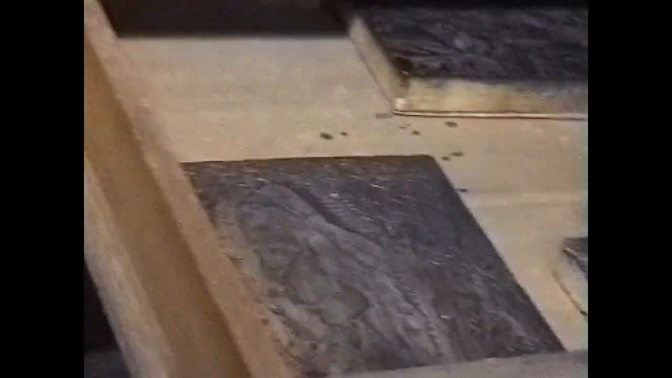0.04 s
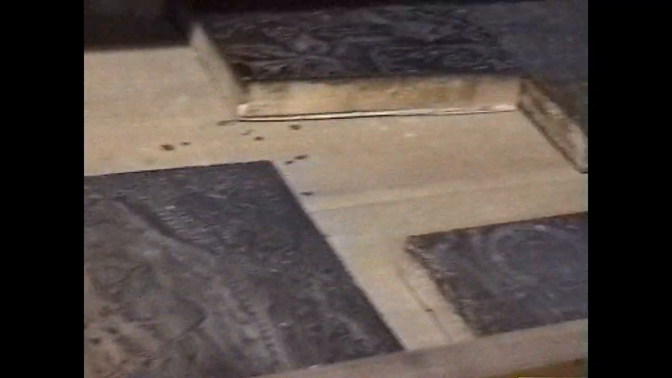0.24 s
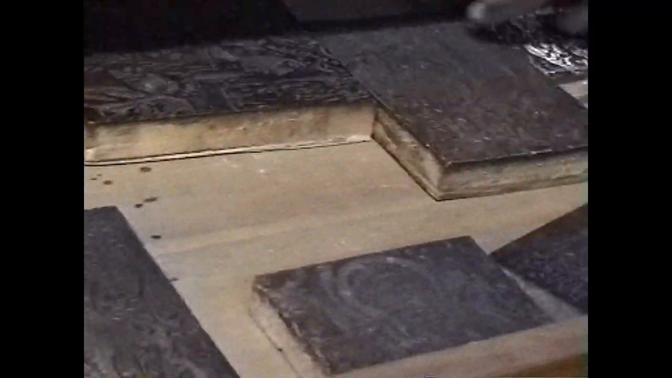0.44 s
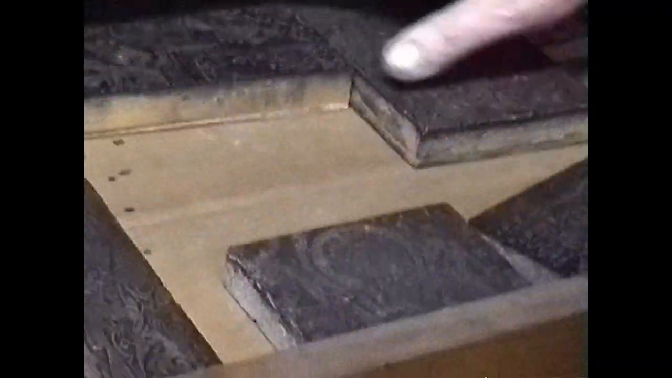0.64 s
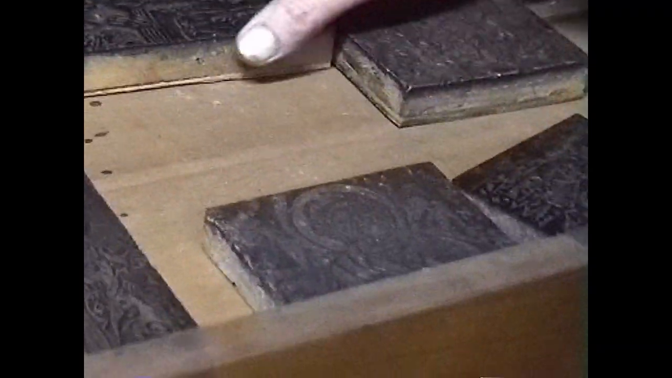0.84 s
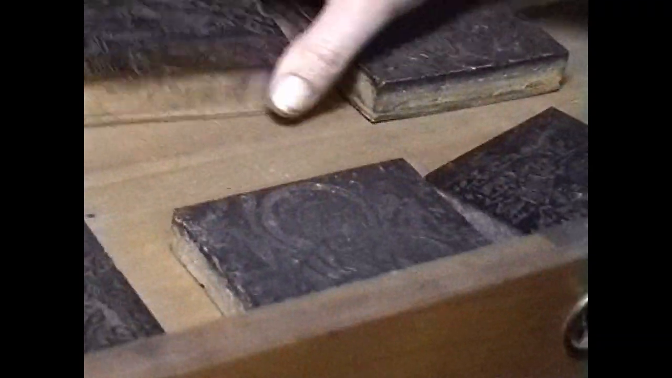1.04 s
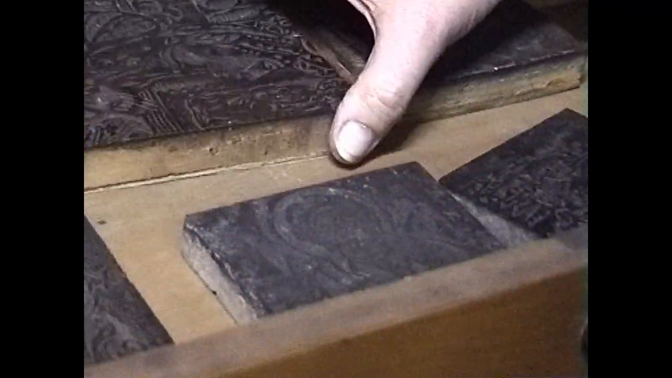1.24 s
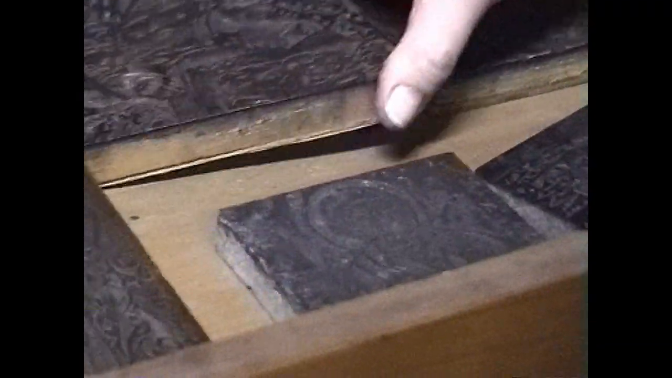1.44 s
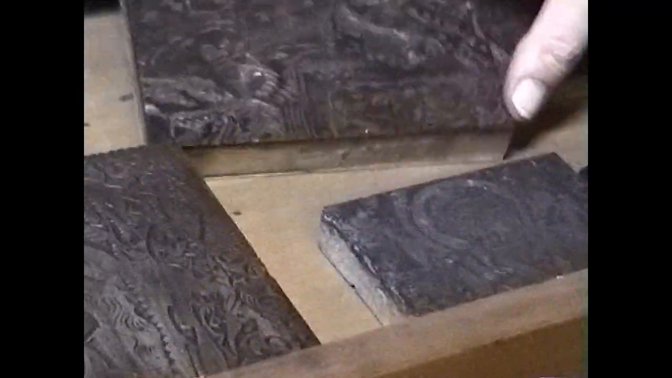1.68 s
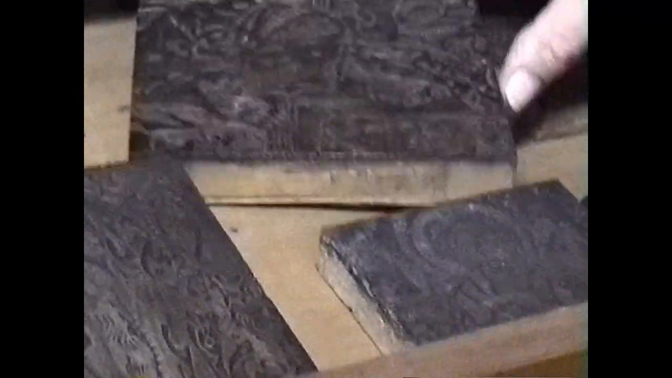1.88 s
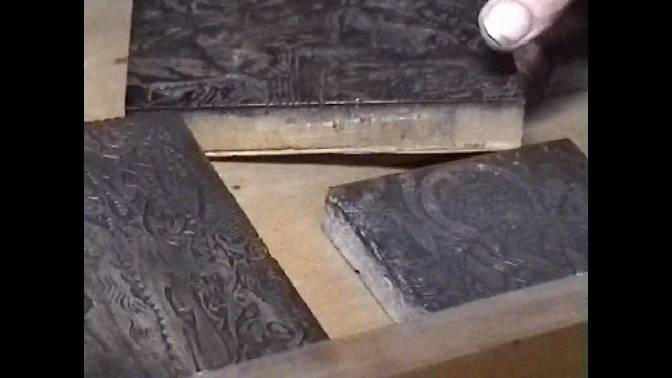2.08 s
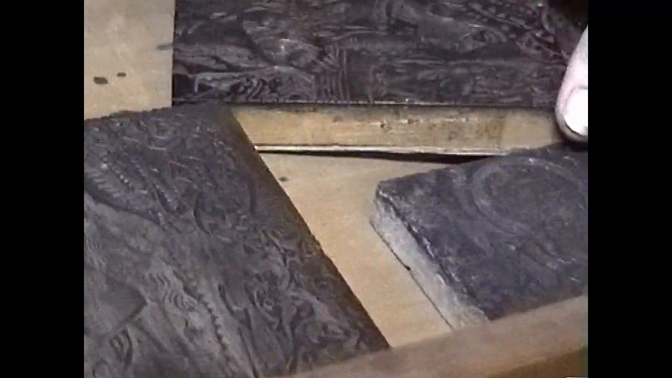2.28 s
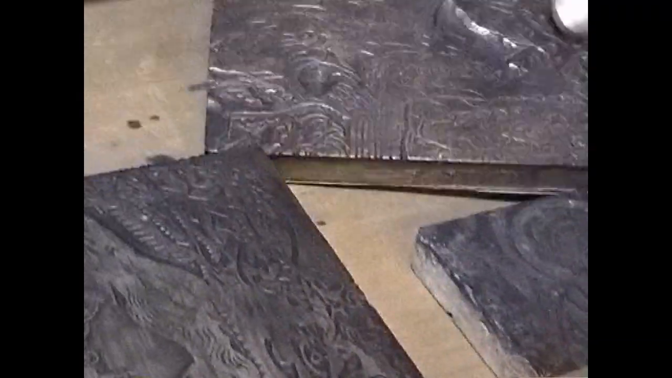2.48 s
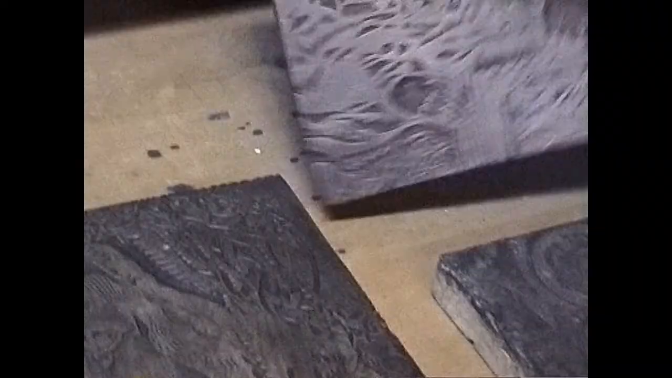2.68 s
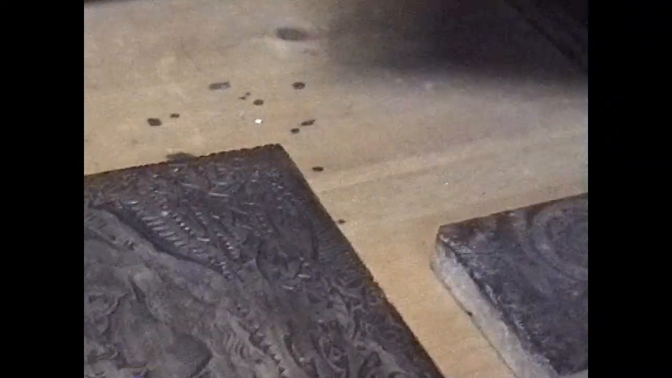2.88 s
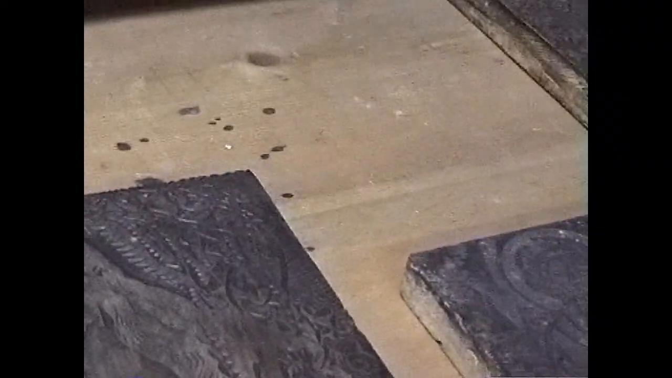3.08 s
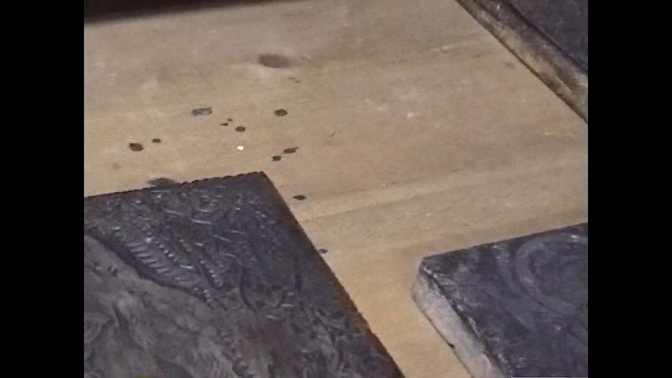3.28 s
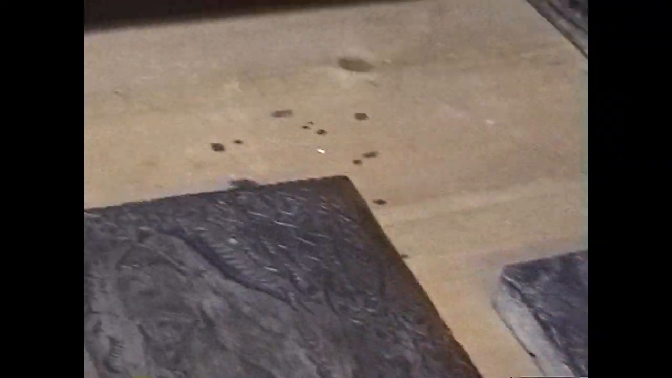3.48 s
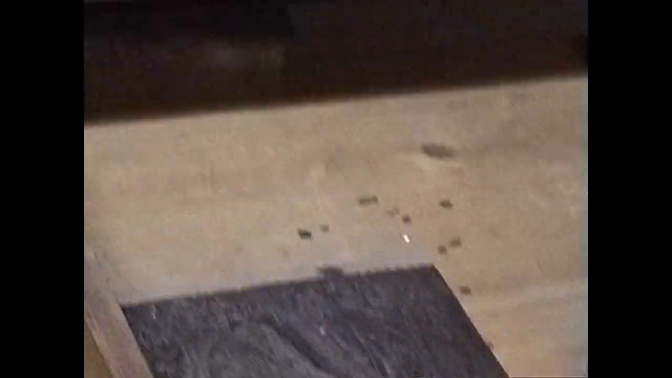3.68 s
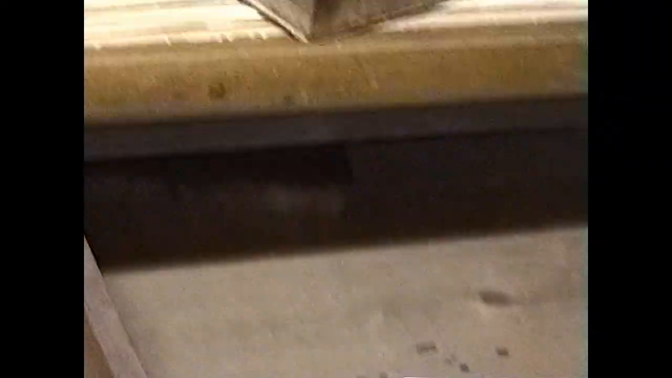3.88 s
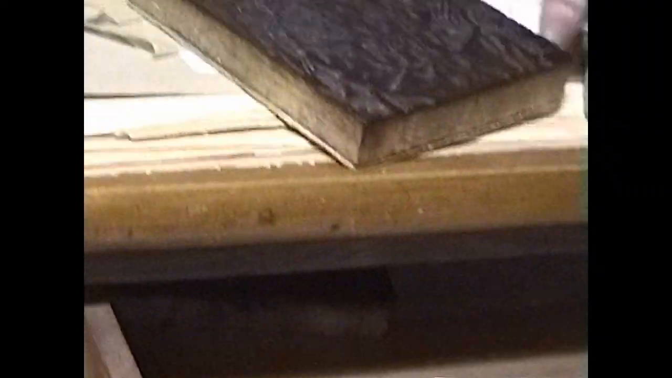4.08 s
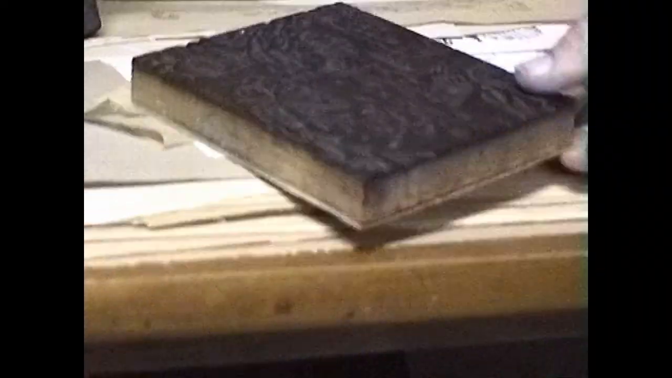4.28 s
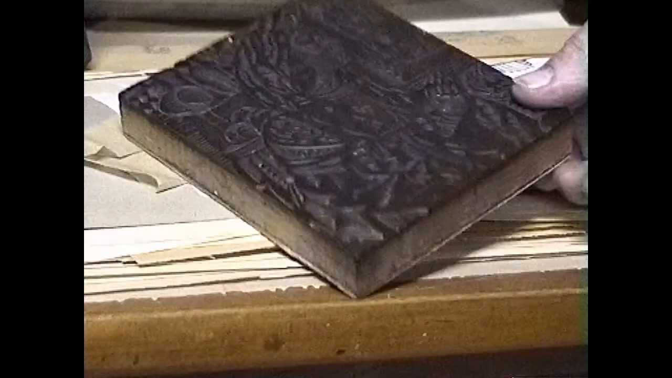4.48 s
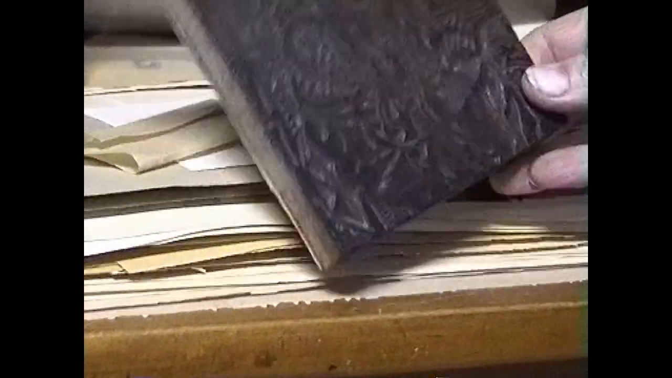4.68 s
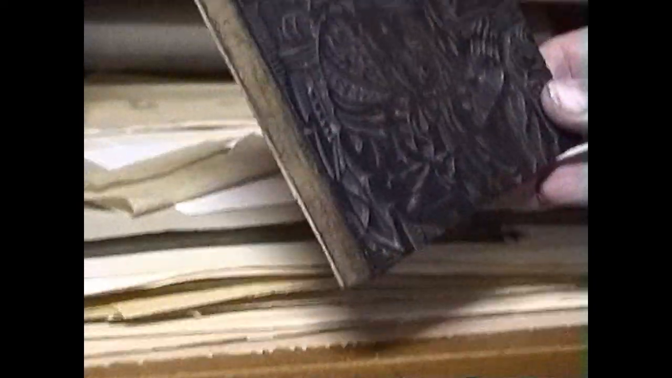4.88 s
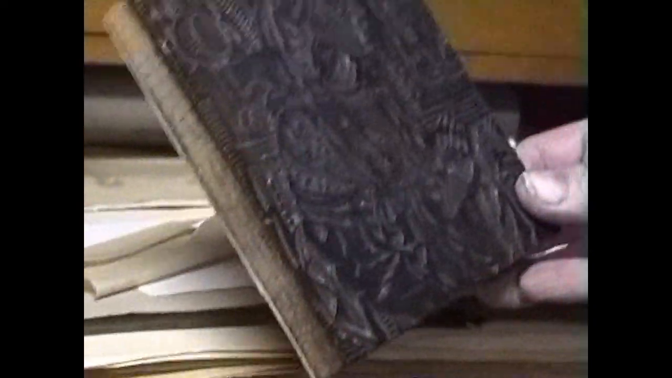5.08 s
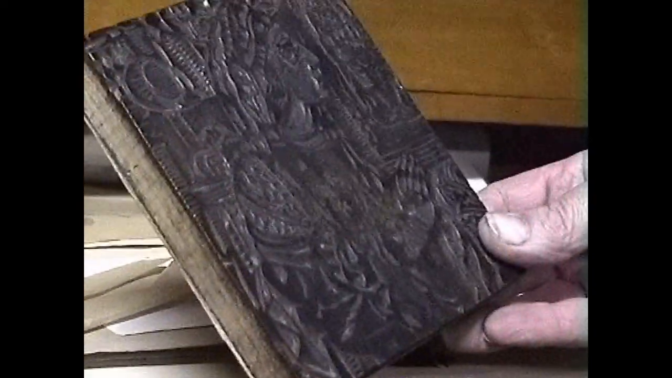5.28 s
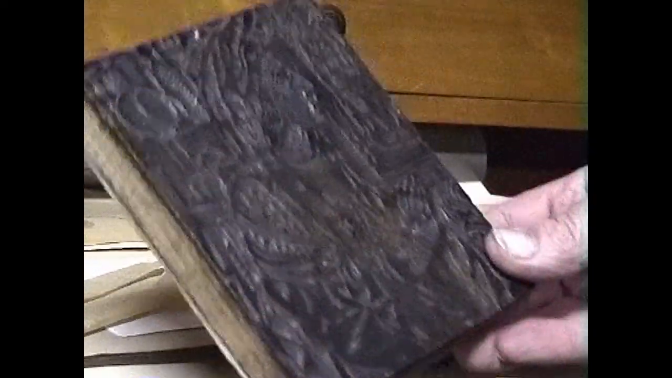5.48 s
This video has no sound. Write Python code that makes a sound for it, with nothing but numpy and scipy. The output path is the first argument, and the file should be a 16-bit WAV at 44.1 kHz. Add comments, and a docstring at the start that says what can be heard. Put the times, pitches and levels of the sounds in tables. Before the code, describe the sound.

Wooden blocks knock and scrape in a wooden drawer, then one is lifted out and set down on papers with a dull thump.

```python
"""Wooden blocks clack together and rock in a wooden drawer, close by in a small room.
Each impact excites the damped modes of a block and the thin drawer floor, which booms; sliding
friction grinds, hisses and squeaks. Then one block is lifted out, brushed by a sleeve, and set down
with a thump on a shelf of rustling papers. A limiter flattens the loudest knocks."""
import sys
import numpy as np
from scipy import signal
from scipy.fft import rfft, irfft, next_fast_len
from scipy.io import wavfile
from scipy.ndimage import uniform_filter1d

SR = 44100
rng = np.random.default_rng(int(sys.argv[2]) if len(sys.argv) > 2 else 0)


def master(y):
    """Save y as 16-bit WAV."""
    cut = np.clip(np.atleast_2d(y).T, -1, 1)
    pcm = np.round(cut * 32767)  # scale
    wavfile.write(sys.argv[1], SR, pcm.astype(np.int16))


N = 244049

# modes of the drawer floor: (frequency [Hz], relative level [dB], t60 [s])
DRAWER_MODES = [(75, -34, .3), (157, -10, .23), (208, -6, .15), (284, 0, .16), (340, -13, .14),
                (452, -14, .17), (560, -16, .16), (630, -9, .15), (790, -16, .12), (1040, -19, .13),
                (1350, -15, .13)]
# dense modes of the blocks, low body and midrange: (frequency [Hz], relative density [dB])
THUD_SPECTRUM = [(25, -14), (70, -20), (120, -15.5), (200, -3.5), (300, -2), (480, -3), (620, -9),
                 (1200, -62)]
CLACK_SPECTRUM = [(200, -26), (420, -5), (620, 2.5), (900, -2), (1150, -5.5), (1500, -9.5), (2100, -12),
                  (3000, -17), (6000, -48), (16000, -73)]


def amp(db):
    """Decibels to amplitude ratio."""
    return 10 ** (np.asarray(db) / 20)


def unit(x):
    """Normalisation to rms 1."""
    return x / np.sqrt(np.mean(x ** 2) + 1e-20)


def unit_attack(x):
    """Normalisation to rms 1 over the first 20 ms."""
    return x / np.sqrt(np.mean(x[..., :SR // 50] ** 2) + 1e-20)


def along(points, hz):
    """Interpolation of (frequency [Hz], value) points on a logarithmic axis."""
    frequencies, values = np.transpose(points)
    return np.interp(np.log(hz + 1), np.log(frequencies + 1), values)


def add(track, s, sound):
    """Superposition: a sound joins the track at s seconds."""
    part = track[:, max(0, round(s * SR)):][:, :sound.shape[-1]]
    part += sound[..., :part.shape[-1]]


def filtered(x, response):
    """Linear filtering: the spectrum is multiplied by a frequency response."""
    size = next_fast_len(x.shape[-1] + 8192)
    return irfft(rfft(x, size) * response(np.fft.rfftfreq(size, 1 / SR)), size)[..., :x.shape[-1]]


def coloured(x, spectrum, size=4096):
    """Minimum-phase filtering: folding the cepstrum gives a causal response with this spectrum."""
    cepstrum = irfft(np.log(amp(along(spectrum, np.fft.rfftfreq(size, 1 / SR)))))
    cepstrum[1:size // 2] *= 2
    cepstrum[size // 2 + 1:] = 0
    impulse_response = irfft(np.exp(rfft(cepstrum)))
    return signal.fftconvolve(x, impulse_response[None], axes=1)[:, :x.shape[-1]]


def peaked(spectrum, hz, peak_db, octaves):
    """Resonance: one broad peak is added to a spectrum."""
    grid = np.geomspace(50, 16000, 200)
    peak = peak_db / (1 + (np.log2(grid / hz) / octaves) ** 2)
    return np.column_stack([grid, along(spectrum, grid) + peak])


def noise(n, wide_db=0, width=None):
    """Partial coherence: mid and side noise make a stereo pair, by default wider in the treble."""
    # stereo width: (frequency [Hz], side against mid [dB])
    default_width = [(100, -14), (500, -14), (2000, -14), (6000, -12), (12000, -6)]
    mid, side = rng.standard_normal((2, n))
    side = filtered(side, lambda hz: amp(along(width or default_width, hz) + wide_db))
    return np.array([mid + side, mid - side])


def burst(spectrum, t60, push=0, rise=1 / SR):
    """Modal overlap: dense, damped modes merge into decaying noise, led by an optional impulse."""
    t = np.arange(SR // 6) / SR
    drive = noise(len(t)) * amp(-60 * t / t60) * (1 - np.exp(-t / rise))
    drive[:, 0] += push * np.linalg.norm(drive[0])
    return unit_attack(coloured(drive, spectrum))


def ring(modes, scatter_db, reach_hz):
    """Free vibration: a board's modes decay exponentially; a slow push excites only the low ones."""
    t = np.arange(SR // 3) / SR
    hz, db, t60 = np.transpose(modes)[:, :, None]
    strength = amp(db + scatter_db * rng.standard_normal(db.shape)) / (1 + (hz / reach_hz) ** 3)
    sign = (-1) ** np.arange(len(hz))[:, None]  # neighbouring modes swing opposite ways
    decay = amp(-60 * t / t60)
    return unit_attack(np.sum(sign * strength * decay * np.sin(2 * np.pi * hz * t), axis=0))


def grit(rate, rough_db, clump_db=2.0, clump_rate=90):
    """Surface roughness: tiny uneven catches, rate a second, modulate noise and come in clumps."""
    catches, clumps = rng.standard_normal((2, N))
    n = np.arange(N)
    fast_db = rough_db * np.interp(n * rate / SR, n, catches)
    slow_db = clump_db * np.interp(n * clump_rate / SR, n, clumps)
    return noise(N) * amp(fast_db + slow_db)


def friction_gains(moves, exponent=1.43):
    """Power law of friction noise: body and treble gains follow a hand that speeds up, then brakes."""
    t = np.arange(N) / SR
    gains = np.zeros((2, N))
    for s, rise, fall, db, treble_db in moves:
        speed = np.clip(np.minimum(1 + (t - s) / rise, 1 - (t - s) / fall), 0, 1)
        gains = np.maximum(gains, amp([[db], [db + treble_db]]) * speed ** exponent)
    return gains


def background(air_db, hum_db):
    """Stationary noise floor: broadband room noise with the line spectrum of a faint electric hum."""
    # room noise: (frequency [Hz], relative density [dB])
    air_spectrum = [(12, -36), (20, 9.5), (41, 2), (85, -4.5), (191, -4), (324, -1.5), (705, -5), (767, -9),
                    (906, -6), (2680, -12), (3000, -12), (3640, -14.5), (4310, -15), (14300, -21.5),
                    (15500, -66)]
    # its stereo width: (frequency [Hz], side against mid [dB])
    air_width = [(30, -4.5), (100, 10), (400, 5.5), (2000, -4), (12000, -1.5)]
    # hum partials: (frequency [Hz], relative level [dB])
    partials = [(199.2, -70.5), (899.0, -75), (1001, -71), (1303, -70.5), (2099, -76)]
    t = np.arange(N) / SR
    hum = sum(amp(db + hum_db) * np.sin(2 * np.pi * (hz * t + rng.random())) for hz, db in partials)
    return amp(air_db) * unit(coloured(noise(N, width=air_width), air_spectrum)) + hum


def rustle(level_db, crossover_hz):
    """Friction of cloth and paper on the lifted block; paper is the crisper above the crossover."""
    # brushing noise: (frequency [Hz], relative density [dB])
    paper_spectrum = [(150, -25), (350, 7.5), (1000, 0.5), (2000, 3), (3000, -1), (5000, -3.5),
                      (8000, -4.5), (11000, -3.5), (13000, -10), (15500, -14)]
    # (time of top speed [s], rise [s], fall [s], level [dB], treble against the rest [dB])
    brushes = [(3.48, 0.099, .18, -43, -5.5), (3.72, 0.17, 0.089, -42.5, -1.5),
               (3.78, 0.03, 0.041, -35.5, 6.5), (4.078, .022, 0.18, -47.5, 5.5),
               (4.296, 0.095, .1, -45, 6.5), (4.41, .09, .08, -49.5, 11), (4.51, 0.39, 0.17, -48.5, 9)]
    brushing = amp(level_db) * unit(coloured(grit(rate=640, rough_db=1.5), paper_spectrum))
    treble = filtered(brushing, lambda hz: hz ** 4 / (hz ** 4 + crossover_hz ** 4))
    soft_gain, crisp_gain = friction_gains(brushes)
    return soft_gain * (brushing - treble) + crisp_gain * treble


def ticks():
    """Brief contacts: wood edges and paper snap too quickly to move the drawer."""
    # light touches: (time [s], level [dB], t60 [s])
    touches = [(1.2697, -38.5, .022), (1.871, -47, 0.012), (2.464, -45, 0.022), (2.503, -41.5, 0.02),
               (3.281, -52.5, 0.016), (3.293, -53.5, 0.016), (3.756, -45, .008), (3.776, -39, .031),
               (3.854, -54, 0.026), (4.4027, -50, 0.0027), (4.42, -47, 0.0045)]
    # a snap: (frequency [Hz], relative density [dB])
    snap_spectrum = [(200, -52), (700, -6), (1500, 11), (3000, 15.5), (6000, 7.5), (11000, 7), (16000, -6)]
    out = np.zeros((2, N))
    for s, db, t60 in touches:
        add(out, s, amp(db) * burst(snap_spectrum, t60=t60, rise=t60 / 10))
    return out


def squeaks(half_width_hz):
    """Stick-slip: a catching corner drives one high, narrow resonance for a moment."""
    # (time of peak [s], frequency [Hz], level [dB], Gaussian half-length [s])
    chirps = [(1.845, 7450, -42, .0092), (2.061, 4520, -44.5, 0.011), (2.41, 4730, -52, 0.039),
              (2.505, 4950, -34.5, 0.0027), (2.506, 5950, -37.5, 0.0054), (3.72, 2780, -54, .056),
              (4.737, 2280, -46.5, 0.0035), (5.056, 3000, -66, 0.11)]
    out = np.zeros((2, N))
    t = np.arange(SR // 2) / SR
    centre = t.mean()
    for s, hz, db, half_length in chirps:
        tone = unit(filtered(noise(len(t)), lambda f: 1 / (1 + ((f - hz) / half_width_hz) ** 2)))
        add(out, s - centre, amp(db) * tone * np.exp(-((t - centre) / half_length) ** 2))
    return out


def slides(grind_db, hiss_db):
    """Forced vibration: wood grain catches on wood grain and drives the resonances of the block."""
    # pushes: (time of top speed [s], rise [s], fall [s], level [dB], hiss against grinding [dB])
    strokes = [(0.745, 0.15, 0.41, -50.5, 3), (1.0, .08, .12, -32, -5), (1.054, 0.13, 0.17, -30, 1),
               (1.149, 0.27, 0.054, -29, -5), (1.46, 0.08, .045, -50.5, 0),
               (1.62, 0.092, 0.23, -50.5, -9.5), (1.706, 0.041, 0.059, -40.5, -7.5),
               (1.856, 0.12, 0.062, -36.5, -2.5), (2.062, 0.044, 0.025, -46, 1.5),
               (2.255, 0.048, 0.062, -43.5, -1), (2.425, 0.078, 0.026, -41.5, -5),
               (2.55, 0.15, .1, -61.5, 9), (2.66, .12, 0.11, -43.5, -7), (2.79, 0.12, 0.16, -51, 9)]
    # low and high friction noise: (frequency [Hz], relative density [dB])
    grind_spectrum = [(88, -27.5), (150, -1.5), (325, 7.5), (442, -5.5), (548, 2), (941, -1.5),
                      (1080, -10.5), (1520, 3), (1640, -12), (2270, 0), (6000, -9.5), (7800, -70),
                      (13200, -120)]
    hiss_spectrum = [(2000, -15.5), (4500, -7), (7000, -3), (10500, -3), (13000, -10.5), (16000, -12.5)]
    # resonances of the rubbed block: (frequency [Hz], bandwidth [Hz], relative level [dB])
    block_modes = [(1035, 97, 2), (2020, 170, 5.5), (1998, 24, 10.5), (2260, 30, -27), (3240, 29, 8),
                   (4430, 26, -7), (5250, 100, -10), (6700, 72, -27), (7060, 97, -6), (8200, 200, -5),
                   (9300, 120, -7), (10100, 48, -11), (10260, 120, -21)]

    def block_response(f):
        """Damped resonators of alternating sign, summed."""
        return sum((-1) ** k * amp(db) * 1j * f * width / (hz * hz - f * f + 1j * f * width)
                   for k, (hz, width, db) in enumerate(block_modes))

    catches = grit(rate=1800, rough_db=1.5)
    resonance = unit(filtered(catches, block_response))
    grind = amp(grind_db) * (unit(coloured(catches, grind_spectrum)) + .5 * resonance)
    hiss = amp(hiss_db) * unit(coloured(grit(rate=410, rough_db=1.0), hiss_spectrum))
    grind_gain, hiss_gain = friction_gains(strokes)
    return grind_gain * grind + hiss_gain * hiss


def bumps(boom_db, thud_db, clack_db):
    """Long contact time: a soft push excites the drawer's lowest modes and barely stirs the blocks."""
    # pushes against the drawer: (time [s], level [dB])
    pushes = [(0.689, -38), (1.35, -35.5), (1.434, -34.5), (3.302, -27), (3.346, -37.5), (3.846, -30),
              (3.890, -36.5)]
    out = np.zeros((2, N))
    for s, db in pushes:
        add(out, s, amp(db + boom_db) * ring(DRAWER_MODES, scatter_db=3.5, reach_hz=96))
        add(out, s, amp(db + thud_db) * burst(THUD_SPECTRUM, t60=0.18, rise=0.0013))
        add(out, s, amp(db + clack_db) * burst(CLACK_SPECTRUM, t60=0.14, rise=.003))
    return out


def landing(ring_db, thud_db):
    """Cushioned impact: paper softens the block's blow, so the shelf answers with a dull thump."""
    # one edge lands after another: (time [s], level [dB])
    edges = [(4.517, -29), (4.5208, -16.5), (4.5232, -14), (4.528, -14)]
    # modes of the loaded shelf: (frequency [Hz], relative level [dB], t60 [s])
    shelf_modes = [(62.6, -13, 0.62), (143, -11.5, 0.33), (172.6, -6, 0.32), (228, 1.5, 0.057),
                   (312, 5.5, 0.075), (439, 2, 0.2), (567, -3, 0.046), (645, 3.5, 0.055), (716, -1, .05),
                   (1387, -9, 0.082)]
    # the soft blow: (frequency [Hz], relative density [dB])
    blow_spectrum = [(25, -27), (100, -10), (230, 8), (450, 8), (680, 0), (800, -10), (950, -19.5),
                     (1500, -23.5), (2400, -32.5), (6000, -60)]
    out = np.zeros((2, N))
    for s, db in edges:
        add(out, s, amp(db + ring_db) * ring(shelf_modes, scatter_db=3.0, reach_hz=1500))
        add(out, s, amp(db + thud_db) * burst(blow_spectrum, t60=0.07, push=1.43))
    return out


def knocks(boom_db, thud_db, clack_db, crack_db):
    """Impact excitation: the edge cracks, the block clacks, the floor booms; harder is brighter."""
    # a block strikes and rocks to rest: (time [s], level [dB], hardness [0 flat face - 1 sharp corner],
    # floor against block [dB], floor excitation cutoff [Hz], clack pitch [Hz], contacts [count], gap [s])
    strikes = [ (0.0165, -11.5, 0.73, -1, 223, 1510, 3, .0198),
               (0.065, -17.5, 0.19, 0.5, 238, 1440, 2, .031), (0.399, -52.5, 0.74, -3, 600, 455, 1, 0),
               (0.536, -46.5, 0.26, -11, 600, 474, 1, 0), (0.717, -43, .2, 2, 300, 1205, 1, 0.0096),
               (0.922, -43.5, 0.16, -4, 500, 483, 1, 0), (1.112, -29, 0.31, 4, 690, 660, 2, .038),
               (1.1635, -24, 0.8, -19, 700, 1090, 1, 0), (1.194, -35.5, 0.74, -13, 400, 800, 1, 0),
               (1.276, -27, 0.18, -8, 600, 630, 1, 0), (1.713, -15, 0.34, 7.5, 930, 666, 2, .0317),
               (1.7237, -19, 0.67, 3.5, 900, 1110, 1, 0), (1.804, -31, .35, -13, 500, 640, 1, 0),
               (1.8731, -16.5, 0.57, 6, 313, 610, 5, .0128), (1.9355, -19, 0.41, -1, 170, 556, 2, .0255),
               (2.302, -27.5, 0.4, -20, 900, 1150, 2, 0.0096), (2.430, -30, 0.48, 4, 500, 1340, 1, 0),
               (2.434, -20, 0.5, -12, 400, 590, 1, 0), (2.471, -26, 0.69, -15, 700, 960, 1, 0),
               (2.476, -22.5, 0.64, -9, 700, 880, 1, 0), (2.631, -30.5, 0.17, 2.5, 400, 463, 3, 0.022),
               (4.292, -46.5, 0.074, -18, 600, 453, 1, 0)]
    # the sharp edge: (frequency [Hz], relative density [dB])
    crack_spectrum = [(600, -8.5), (1500, 8.5), (2600, 1.5), (4000, -0.5), (5500, -3), (8000, -13),
                      (11000, -17.5), (16000, -27)]
    settle_db_per_s, rebound_hz, spread_octaves = 147, 680, 0.21
    thud_slope_db, clack_slope_db, crack_slope_db = -1.5, 10, 44  # from flat face to sharp corner
    out = np.zeros((2, N))
    for start, strength_db, hardness, floor_db, reach_hz, pitch_hz, contacts, gap in strikes:
        edge = hardness - .5
        for k in range(contacts):
            s = start + k * gap
            db = strength_db - settle_db_per_s * k * gap
            clack_hz = rebound_hz * 2 ** (spread_octaves * rng.standard_normal()) if k else pitch_hz
            block_spectrum = peaked(CLACK_SPECTRUM, clack_hz, peak_db=12.0, octaves=0.16)
            boom = ring(DRAWER_MODES, scatter_db=1.0, reach_hz=reach_hz)
            thud = burst(THUD_SPECTRUM, t60=0.13, push=0.043)
            clack = burst(block_spectrum, t60=.055, push=.8)
            crack = burst(crack_spectrum, t60=0.05, rise=0.001)
            add(out, s, amp(db + floor_db + boom_db) * boom)
            add(out, s, amp(db + thud_slope_db * edge + thud_db) * thud)
            add(out, s, amp(db + clack_slope_db * edge + clack_db) * clack)
            add(out, s, amp(db + crack_slope_db * edge + crack_db) * crack)
    return out


def walls(x, echo_db, count=8):
    """Early reflections: the drawer's walls return the treble within milliseconds and comb it."""
    delays = rng.uniform(.0005, .007, (2, count))
    echoes = np.zeros((2, SR // 100))
    np.put_along_axis(echoes, (delays * SR).astype(int), rng.choice([-1, 1], (2, count)), axis=1)
    treble = filtered(x, lambda hz: hz ** 2 / (hz ** 2 + 1500 ** 2))
    return amp(echo_db) / np.sqrt(count) * signal.fftconvolve(treble, echoes, axes=1)[:, :N]


def room(x, delay, places=12):
    """Diffuse reverberation: each stretch of time has its own tail, as the blocks change place."""
    # reverberation time: (frequency [Hz], t60 [s])
    decay_times = [(80, 0.34), (200, 0.63), (500, 0.54), (1200, 0.46), (3000, 0.34), (10000, 0.29)]
    out = np.zeros((2, N))
    for part in np.array_split(np.arange(N), places):
        hz, t, bands = signal.stft(noise(SR * 2 // 3, wide_db=7.5), SR, nperseg=256)
        decay = amp(-60 * t / along(decay_times, hz)[:, None])
        tail = signal.istft(bands * decay, SR, nperseg=256)[1]
        tail /= np.linalg.norm(tail[0])
        add(out, part[0] / SR + delay, signal.fftconvolve(x[:, part], tail, axes=1))
    return out


def scene():
    """Superposition of direct sound, reflections and room noise; the drawer's bass leans right."""
    # stereo balance: (frequency [Hz], left minus right [dB])
    balance = [(30, 1.5), (100, -3.5), (280, -3.8), (600, -1), (1500, -.3), (12000, -.5)]
    direct = knocks(boom_db=-5.0, thud_db=-1, clack_db=-2.5, crack_db=-16.5) + ticks()
    direct += bumps(boom_db=-6.5, thud_db=-13.5, clack_db=-20)
    direct += landing(ring_db=-7.5, thud_db=-5.0)
    direct += slides(grind_db=0, hiss_db=-1) + squeaks(half_width_hz=140)
    direct += rustle(level_db=-2.5, crossover_hz=4840)
    # the deepest bass, below about 60 Hz, is rolled off
    direct = signal.sosfilt(signal.butter(2, 60, "high", fs=SR, output="sos"), direct)
    heard = direct + walls(direct, echo_db=-5) + amp(-8) * room(direct, delay=.007)
    heard = filtered(heard, lambda hz: amp(np.outer([1, -1], along(balance, hz)) / 2))
    return heard + background(air_db=-49.0, hum_db=3.0)


def limited(x, ceiling_db, release_db_per_s, smooth_samples=40):
    """Peak limiting: the gain ducks within a millisecond of a peak and recovers steadily."""
    over_db = np.maximum(20 * np.log10(np.abs(x).max(0) + 1e-9) - ceiling_db, 0)
    recovery_db = release_db_per_s * np.arange(N) / SR
    duck_db = np.maximum.accumulate(over_db + recovery_db) - recovery_db
    return x * amp(-uniform_filter1d(duck_db, smooth_samples))


def record(dry):
    """Peak and band limiting: the loudest knocks are flattened and the highest treble is cut."""
    return filtered(limited(dry, ceiling_db=-4.5, release_db_per_s=154), lambda hz: hz < 15500)


dry = scene()
out = record(dry)
master(out)
```